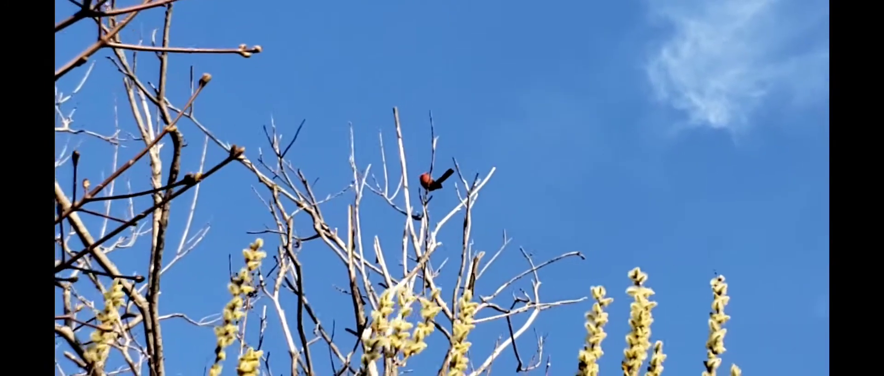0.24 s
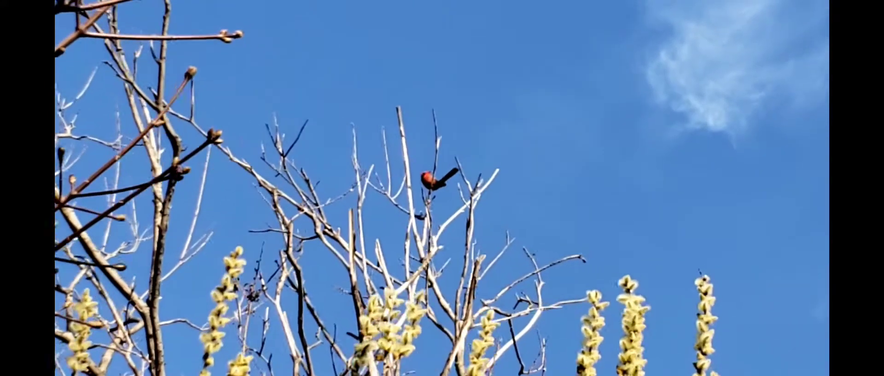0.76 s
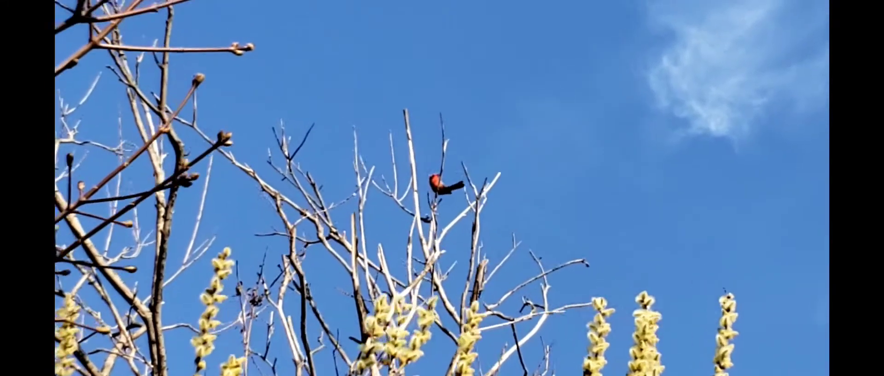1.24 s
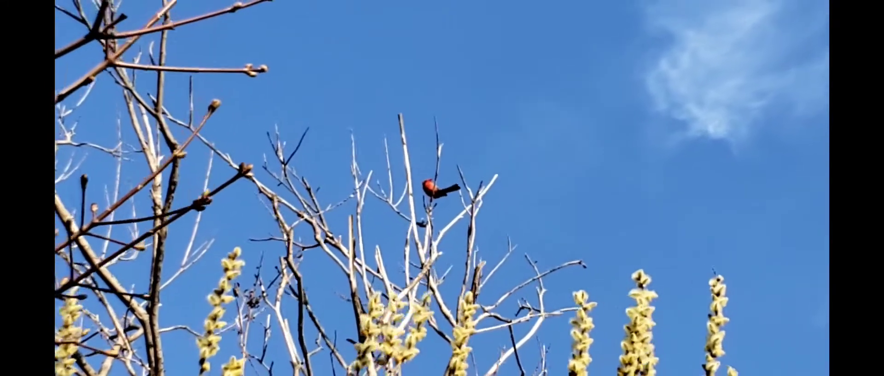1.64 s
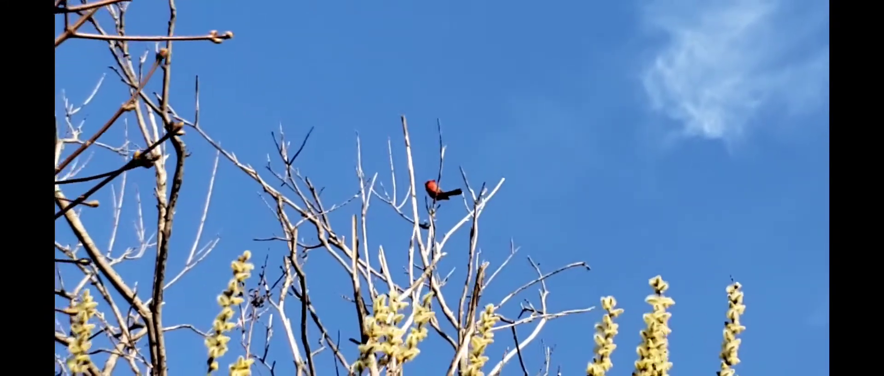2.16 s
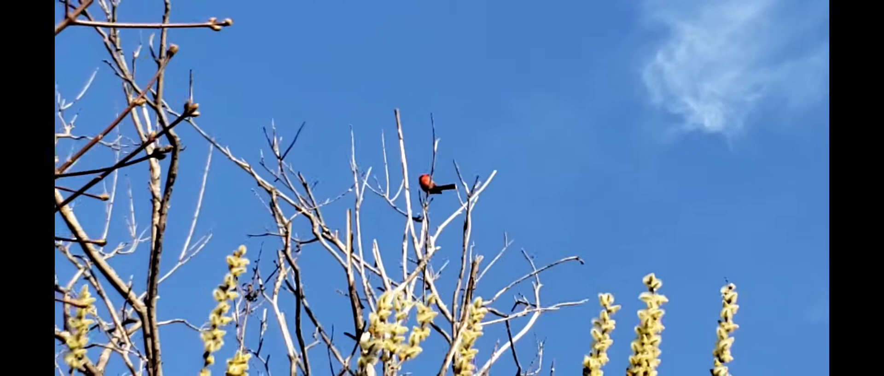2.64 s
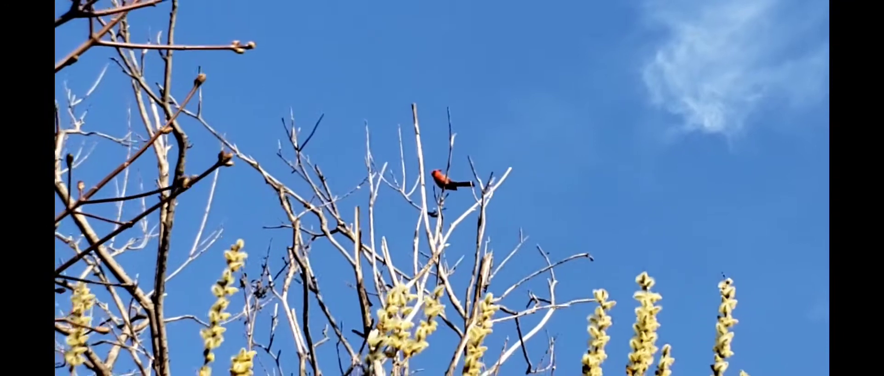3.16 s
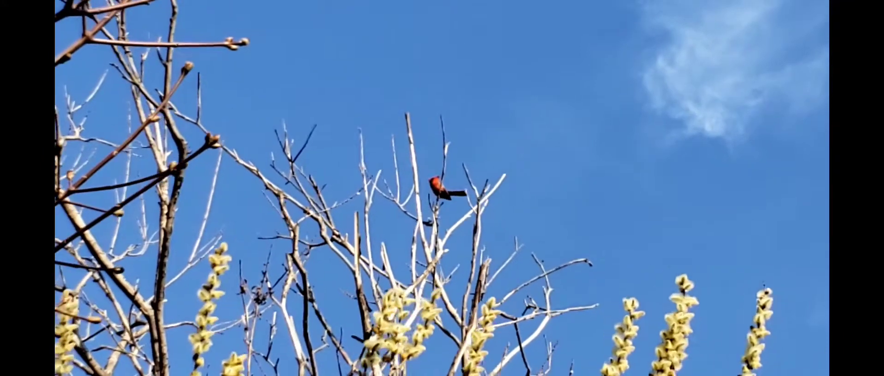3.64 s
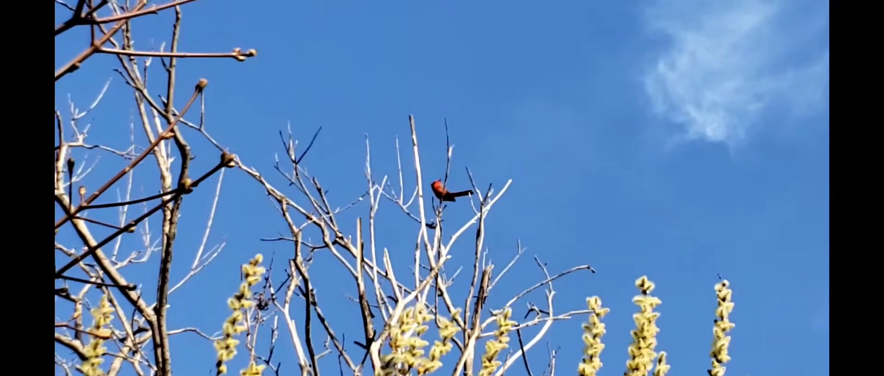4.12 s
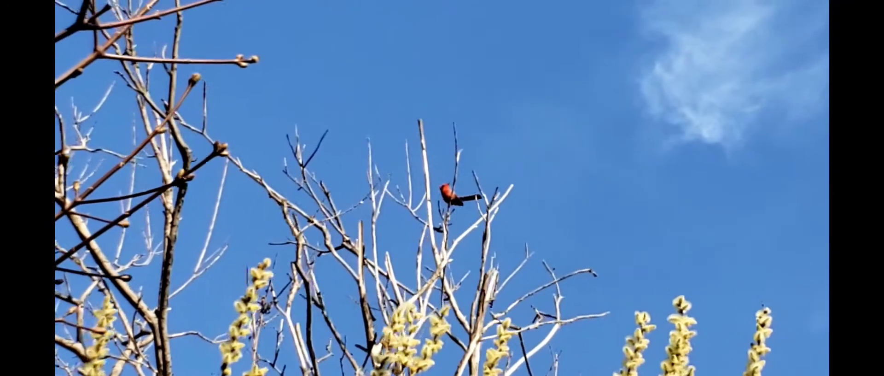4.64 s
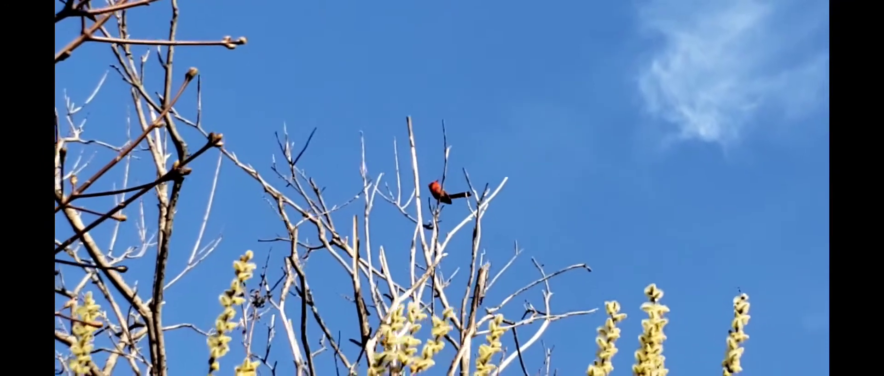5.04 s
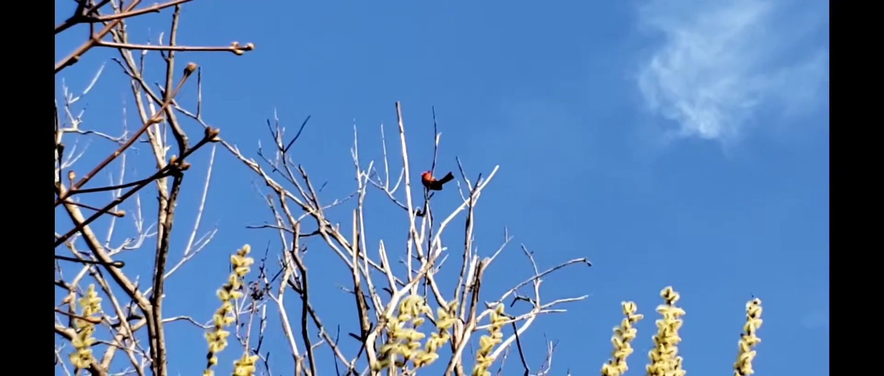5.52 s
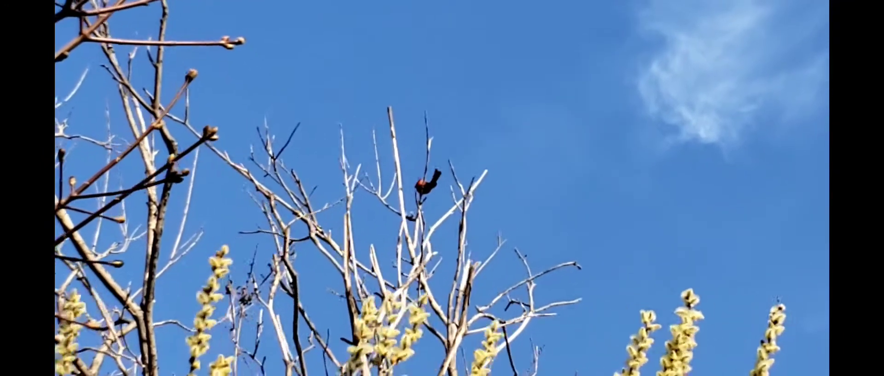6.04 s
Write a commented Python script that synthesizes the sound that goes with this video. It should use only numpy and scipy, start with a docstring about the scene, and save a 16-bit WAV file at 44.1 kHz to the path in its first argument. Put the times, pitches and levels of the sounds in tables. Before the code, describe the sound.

A red songbird in a bare treetop sings seven pure whistles, each swooping upward and swelling before stopping sharply, about every seven tenths of a second. Echo from trees and a wall trails each one. A hand-held microphone picks up low wind puffs, soft bumps and finger rubs. A small metal clink sounds close after the first whistle, and two more after the last. Distant outdoor air murmurs quietly.

```python
"""Light wind puffs on a hand-held microphone over far outdoor air, made of shaped noise, and the hand bumps it.
A cardinal in a bare treetop then sings seven rising whistles: gliding tones, echoed by a wall and the trees.
Between them come two falling chips, short ringing snaps, finger brushes on the case and a far bird's thin note.
Something small and metal, built from ringing modes and a noisy crack, clinks close by: once after
the first whistle, and twice more after the last."""
import sys
import numpy as np
from scipy import signal
from scipy.fft import rfft, irfft, next_fast_len
from scipy.io import wavfile
from scipy.ndimage import uniform_filter1d, map_coordinates

SR = 44100
rng = np.random.default_rng(int(sys.argv[2]) if len(sys.argv) > 2 else 0)


def pcm_store(signal):
    """Save signal as 16-bit PCM."""
    levels = np.round(np.clip(np.atleast_2d(signal), -1, 1) * 32767)
    wavfile.write(sys.argv[1], SR, levels.astype(np.int16).T)


N = 277080
TOP_HZ = 15700  # the recorder's band limit

# whistles: (end [s], length [s], glide early by [s], pitch ratio until the last flick, flick's pitch goal [Hz],
# level [dB], extra level of the low opening [dB], extra level of the overtones [dB])
WHISTLES = [(.732, .305, .011, 0.98, 3480, -5, -10, -1), (1.457, .325, -0.00085, 1.02, 3550, -4.5, -3, -1),
            (2.483, .328, -0.0031, 1.005, 3460, -5.5, -3.5, -5.5),
            (3.208, 0.37, 0.0054, 1.0, 3260, 2, -4, 0.5), (3.909, .46, 0, 1.0, 3390, 0.5, .5, 1.5),
            (4.573, .45, -0.00069, 0.99, 3330, -1.5, 2.5, 0), (5.241, .44, -.005, .988, 3170, -2, 3.5, 0)]
# the upward glide shared by all whistles, with two small steps: (time from the end [s], pitch [Hz])
GLIDE = [(-.44, 1350), (-.36, 1610), (-.28, 1795), (-.2, 2070), (-.145, 2250), (-.12, 2520), (-.065, 2790),
         (-.045, 3070), (-.018, 3360), (0, 3380)]
# their shared loudness, swelling three times and easing at each step: (time from the end [s], level [dB])
SWELL = [(-.44, -53.5), (-.35, -52.5), (-.27, -38), (-.18, -36), (-.15, -40.5), (-.1, -31.5), (-.075, -38),
         (-.037, -29.5), (-.016, -34.5), (0, -45.5)]
# the low opening gives way to the full voice: (start, finish), times from the end [s]
OPENING_S = (-.2, -0.11)
# the last flick heads for the whistle's own pitch goal: (start, finish), times from the end [s]
FLICK_S = (-0.068, -.02)
# overtone strength by where the overtone falls: (frequency [Hz], level [dB])
OVERTONES = [(3000, -20.5), (4500, -40.5), (6900, -31.5), (7700, -22.5), (8600, -31.5), (9700, -31.5),
             (11500, -36), (13000, -39), (14500, -30.5)]
# short falling chips between whistles: (time [s], starting pitch [Hz], level [dB])
CHIPS = [(.757, 2200, -54), (4.017, 2246, -48.5)]
# scattered echoes: (delay [s], level [dB], time to fade by 60 dB [s])
ECHOES = [(.002, -7, .12), (.035, -12, .22), (.074, -17, .13)]
# the branches send back mostly the middle of the glide: (frequency [Hz], level [dB])
ECHO_COLOUR = [(1700, -3), (2500, 1.5), (3400, -2.5)]
# high fizz that follows the whistles: (frequency [Hz], level [dB])
FIZZ = [(5000, -7), (8000, -8), (11500, 7), (15500, -17)]
# short snaps with a quick 2 kHz ring, most of them probably clipped bird chips: (time [s], level [dB])
SNAPS = [(.834, -52), (2.032, -44), (3.324, -50), (4.682, -44)]
# metal contacts: (time [s], level [dB], treble tilt [dB per octave], metal held 0 or free 1, thump level [dB])
CLINKS = [(0.9635, -25.5, -0.5, 0, -65), (0.9715, -42, 4, 0, -53), (5.4968, -40.5, 3, 1, -62),
          (5.504, -35, 4, 1, -60), (5.512, -47, 4, 1, -37.5), (5.6028, -36, 4.5, 1, -50),
          (5.609, -34, 2.5, 1, -32.5), (5.621, -42, 8, 1, -58)]
# the metal's ringing modes: (frequency [Hz], level [dB], time to fade by 60 dB [s], rings when held 0 or free 1)
METAL = [(1686, -13, 0.2, 0), (2766, 3.5, 0.05, 0), (2826, -4.5, 0.1, 0), (4430, -15.5, 0.12, 0),
         (5200, -14, 0.036, 0), (5950, -12.5, 0.11, 0), (6632, -13, 0.071, 0), (7800, -12, 0.058, 0),
         (2808, 7, 0.1, 1), (2890, -12, 0.3, 1), (3960, -6, 0.16, 1), (4680, -11, 0.12, 1),
         (4900, -30, .16, 1), (5110, -7.5, 0.19, 1), (6030, -14.5, 0.18, 1), (6530, -31, .09, 1),
         (6570, -14, 0.13, 1), (7600, -22, 0.11, 1), (8130, -18, 0.19, 1), (9652, -28, 0.27, 1),
         (10060, -25, 0.089, 1), (10700, -29, 0.17, 1), (11200, -26, 0.17, 1), (12140, -31, 0.096, 1),
         (14750, -31, 0.17, 1)]
# noise colour of a sharp crack or snap: (frequency [Hz], level [dB])
CRACK = [(800, -5), (1800, 7.5), (3000, 7.5), (6500, 1.5), (7300, -15), (8100, -14), (11500, -28),
         (13000, -20), (15000, -16)]
# finger brushes: (middle [s], spread [s], level [dB])
BRUSHES = [(0.539, .018, -55), (0.834, 0.015, -47.5), (0.922, 0.027, -56.5), (1.107, 0.073, -65),
           (1.405, 0.037, -55.5), (2.042, 0.015, -61), (3.332, 0.018, -60), (3.465, 0.039, -52.5),
           (4.7, 0.063, -62.5), (5.354, 0.018, -56.5)]
# noise colour of fingers on the case: (frequency [Hz], level [dB])
CASE = [(2500, -16), (3600, -3.5), (3950, 6.5), (4400, -6.5), (6300, -7), (8000, -10.5), (9000, -18),
        (15000, -23)]
# soft bumps of the hand: (middle [s], pitch [Hz], level [dB])
BUMPS = [(0.313, 66.1, -28.5), (0.583, 61, -51), (0.884, 78, -33.5), (1.532, 55.4, -36.5),
         (2.446, 65.4, -46), (2.624, 156, -26.5), (2.801, 129, -27), (5.904, 68.5, -30), (6.154, 76, -37.5)]
# puffs of wind on the microphone: (peak [s], length [s], buffet level [dB], flutter level [dB])
GUSTS = [(0.331, 0.044, -35, -45), (.61, 0.1, -36, -37.5), (0.758, 0.093, -43.5, -42.5),
         (.92, .1, -40.5, -51), (1.321, 0.094, -39, -47.5), (1.514, 0.044, -44.5, -56),
         (2.047, .08, -46, -59), (2.443, 0.067, -41.5, -55), (2.607, 0.17, -45.5, -41),
         (2.793, 0.03, -39, -40.5), (3.036, 0.12, -39.5, -47), (3.405, 0.12, -41.5, -54.5),
         (3.605, 0.084, -42, -52), (4.556, .25, -50, -70), (5.63, 0.046, -45, -58), (6.15, .1, -48, -52)]
# colour of the low wind buffet: (frequency [Hz], level [dB])
BUFFET = [(15, -23), (30, -10), (60, -2.5), (100, -4), (160, -14.5), (300, -50), (600, -66)]
# colour of the higher wind flutter: (frequency [Hz], level [dB])
FLUTTER = [(60, -14.5), (140, 6), (220, -1), (350, -3.5), (550, -16.5), (1200, -75)]
# strength of the distant air: (time [s], level [dB])
AIR = [(0.0, -55.5), (0.19, -58), (5.68, -53.5), (5.75, -56), (5.96, -52.5), (6.28, -54.5)]
# colour of the far outdoor murmur: (frequency [Hz], level [dB])
DISTANCE = [(80, -42), (250, -0.5), (500, -3.5), (900, 0.5), (1400, -6), (2000, -15.5), (2600, -14.5),
            (3400, -27), (5000, -34.5), (9000, -49)]
# colour of the higher rush: (frequency [Hz], level [dB])
RUSH = [(500, -25), (1000, -1.5), (1500, 5), (2400, -1), (3400, -31), (6000, -28.5)]
# colour of the thin hiss: (frequency [Hz], level [dB])
HISS = [(1500, -48), (3500, 8), (5000, 3.5), (7500, 6), (8700, -25), (10500, -9), (12000, 3.5),
        (15500, -12)]


def amp(db):
    """Turn decibels into a plain multiplier."""
    return 10 ** (np.asarray(db) / 20)


def unit(x):
    """Scale x to an average (rms) strength of 1."""
    return x / np.sqrt(np.mean(x ** 2) + 1e-20)


def along(points, hz):
    """Read a (frequency, value) curve at hz, with frequency on a log axis."""
    f, v = np.transpose(points)
    return np.interp(np.log(hz + 1), np.log(f), v)


def clock():
    """The time of each sample, in seconds."""
    return np.arange(N) / SR


def wobble(rate):
    """A smooth random curve through rate random points a second."""
    points = rng.standard_normal(int(N * rate / SR) + 4)
    return map_coordinates(points, [clock() * rate])


def filtered(x, response):
    """Multiply each frequency of x by response(frequency)."""
    m = next_fast_len(N + 8192)  # room for tails past the end
    hz = np.fft.rfftfreq(m, 1 / SR)
    return irfft(rfft(x, m) * response(hz), m)[..., :N]


def noise(spectrum, alike):
    """Coloured stereo noise of rms 1; alike is the left-right correlation."""
    a, b = filtered(rng.standard_normal((2, N)), lambda hz: amp(along(spectrum, hz)))
    turn = np.arccos(np.clip(alike, -1, 1)) / 2
    return unit(np.cos(turn) * a + np.sin(turn) * np.array([b, -b]))


def add(out, s, sound):
    """Mix a sound into out from time s."""
    part = out[..., max(round(s * SR), 0):][..., :sound.shape[-1]]
    part += sound[..., :part.shape[-1]]


def scatter(x, delay, t60):
    """Many twigs and surfaces return x as a fading random tail, different on each side."""
    t = np.arange(SR) / SR
    tail = rng.standard_normal((2, SR)) * amp(-60 * t / t60)
    tail /= np.linalg.norm(tail, axis=1, keepdims=True)
    late = np.pad(x, (max(round(delay * SR), 0), 0))
    return signal.fftconvolve(late[None], tail, axes=1)[:, :N]


def cardinal(song_db=-1, lag=.00004, side_db=0.2, trees_db=-18, overtone_db=-6, overtone_echo_db=-3):
    """The song arrives directly, from the branches and wall, and as a long wash from the trees."""
    wall_s, wall_db = .078, -18.5
    tone, overtones = whistles()
    song = amp(song_db) * tone + chips()

    # the direct sound reaches the left side lag seconds after the right
    half_turn = lag * np.array([[-1], [1]])
    direct = filtered(song + amp(overtone_db) * overtones, lambda hz: np.exp(1j * np.pi * hz * half_turn))
    echoes = sum(amp(db) * scatter(song, delay, t60) for delay, db, t60 in ECHOES)
    add(echoes, wall_s, amp(wall_db) * song)
    echoes = filtered(echoes, lambda hz: amp(along(ECHO_COLOUR, hz)))
    wash = amp(trees_db) * scatter(song, delay=.04, t60=.65)
    sheen = amp(overtone_echo_db) * scatter(overtones, delay=.001, t60=0.33)

    # a faint high fizz swells and fades with each whistle
    loudness = np.sqrt(np.abs(uniform_filter1d(tone ** 2, size=3000)))
    fizz = amp(-31.0) * loudness * noise(FIZZ, alike=0)
    return direct * amp([[side_db], [-side_db]]) + echoes + wash + sheen + fizz


def whistles(shimmer_db=2.2, flicker_db=3, blur=0.45):
    """Nearly pure upward glides; faint overtones at whole multiples of the pitch flicker and blur."""
    edge_s = .005  # soft start and stop
    fade_in_s, fade_in_db = 0.092, -11  # each whistle grows out of a faint start
    tone, overtones = np.zeros(N), np.zeros(N)
    drift = 1 + .004 * wobble(90)
    shimmer = shimmer_db * wobble(70)
    k = np.arange(2, 10)[:, None]  # overtone numbers
    flicker = np.array([flicker_db * wobble(24.92) for _ in k])
    smear = np.array([blur * wobble(400) for _ in k])

    for end, length, early, ratio, goal_hz, level_db, opening_db, bright_db in WHISTLES:
        on = (clock() > end - length) & (clock() < end + edge_s / 2)
        t = clock()[on] - end

        hz = np.interp(t + early, *np.transpose(GLIDE))
        hz *= np.interp(t, FLICK_S, [ratio, goal_hz / GLIDE[-1][1]]) * drift[on]
        phase = 2 * np.pi * np.cumsum(hz) / SR

        db = np.interp(t + early, *np.transpose(SWELL)) + level_db
        db += np.interp(t, OPENING_S, [opening_db, 0])
        db += np.interp(t + length, [0, fade_in_s], [fade_in_db, 0])
        edges = np.clip(np.minimum(t + length, edge_s / 2 - t) / edge_s, 0, 1)
        level = np.sqrt(2) * amp(db + shimmer[on]) * edges

        tone[on] += level * np.sin(phase)
        share = amp(bright_db + flicker[:, on] + along(OVERTONES, k * hz)) * (k * hz < TOP_HZ)
        overtones[on] += level * np.sum(share * np.sin(k * phase + smear[:, on]), axis=0)
    return tone, overtones


def chips(length=0.0288, fall=0.178):
    """Quiet short notes whose pitch drops quickly by the share fall."""
    out, t = np.zeros(N), np.arange(round(length * SR)) / SR
    arch = np.sin(np.pi * t / length)
    for s, hz, db in CHIPS:
        phase = 2 * np.pi * np.cumsum(hz * (1 - fall * t / length)) / SR
        add(out, s, amp(db) * arch * np.sin(phase))
    return out


def snaps(t60=0.029, ring_hz=1980, ring_db=-1):
    """Short snaps of noise with a quick 2 kHz ring, most of them probably clipped bird chips."""
    t = clock()
    fades = sum(amp(db - 60 * np.abs(t - s) / t60) * (t >= s) for s, db in SNAPS)
    ring = amp(ring_db) * np.sqrt(2) * np.sin(2 * np.pi * ring_hz * t)
    return fades * (noise(CRACK, alike=.1) + ring)


def clinks(ring_db=-2, crack_db=-9, held_t60=0.064, free_t60=0.12, rattle=0.77):
    """Each contact rings the metal, which rattles as it rings, spits a crack and shakes the microphone."""
    thump_hz, thump_t60, thump_rise, thump_delay = 54, 0.16, 0.015, 0.011  # Hz, then seconds
    out, burst, t = np.zeros((2, N)), np.zeros(N), np.arange(SR // 3) / SR
    attack = 1 - np.exp(-(t / .0003) ** 2)
    thump = 2 * amp(-60 * t / thump_t60) * np.minimum(t / thump_rise, 1) * np.sin(2 * np.pi * thump_hz * t)

    for s, db, treble_db, free, thump_db in CLINKS:
        for hz, mode_db, t60, group in METAL:
            if round(group) != round(free):
                continue
            tilt_db = treble_db * np.log2(hz / 2800)
            uneven_db = rng.normal(0, 2.2, (2, 1))  # differs left and right
            strength = amp(db + ring_db + mode_db + tilt_db + uneven_db)
            shake = rattle * map_coordinates(rng.standard_normal(len(t)), [t * 300])
            phase = rng.uniform(0, 2 * np.pi) + rng.normal(0, 1.0, (2, 1)) + shake
            add(out, s, strength * attack * amp(-60 * t / t60) * np.sin(2 * np.pi * hz * t + phase))
        crack_t60 = free_t60 if round(free) else held_t60
        add(burst, s, amp(db + crack_db - 60 * t / crack_t60))
        add(out, s + thump_delay, amp(thump_db) * thump)
    return (out + burst * noise(CRACK, alike=0.044)) * amp([[1], [-1]])  # a little louder on the left


def hand():
    """Fingers rub the case as grainy noise and bump it softly with short low tones."""
    t = clock()
    rub = sum(amp(db) * np.exp(-.5 * ((t - s) / spread) ** 2) for s, spread, db in BRUSHES)
    grain = unit(amp(3.5 * wobble(300)))
    brushes = rub * grain * noise(CASE, alike=0.1)

    bumps = np.zeros(N)
    for s, hz, db in BUMPS:
        bumps += amp(db) * np.exp(-((t - s) * hz) ** 2) * np.cos(2 * np.pi * hz * (t - s))
    return brushes + bumps * amp([[0], [-2]])


def wind(buffet_gain_db=1.5, flutter_gain_db=1.0, lumps_db=3.0):
    """Eddies come in lumps, partly shared and partly separate at each microphone port."""
    push, flap = gusts()
    lumps = unit(amp(lumps_db * np.array([wobble(30), wobble(30)])))
    slaps = unit(amp(4 * wobble(38)))
    # the buffet strikes the two sides independently, a little harder on the left
    buffet = push * amp(buffet_gain_db) * noise(BUFFET, alike=-0.036) * amp([[.7], [-.5]])
    flutter = flap * amp(flutter_gain_db) * slaps * noise(FLUTTER, alike=0.32)
    return lumps * (buffet + flutter)


def gusts():
    """Strength of the low buffet and higher flutter: puffs rise fast and fall slower over a light breeze."""
    calm_db = np.array([[-53.5], [-58]])  # buffet and flutter between puffs
    freshen = 0.46  # dB per second
    rise, fall = 0.88, 1.25  # shares of a puff's length
    power = amp(calm_db + freshen * clock()) ** 2
    for s, length, buffet_db, flutter_db in GUSTS:
        u = (clock() - s) / length
        puff = np.exp(-(u / np.where(u < 0, rise, fall)) ** 2)
        power = power + (amp([[buffet_db], [flutter_db]]) * puff) ** 2
    return np.sqrt(power)


def far_bird(s=1.575, hz=5700, db=-69, t60=0.53, rise=0.0065):
    """One thin, distant note: a steady tone that starts quickly and fades away."""
    t = np.maximum(clock() - s, 0)
    return amp(db - 60 * t / t60) * np.minimum(t / rise, 1) * np.sin(2 * np.pi * hz * t)


def air(murmur_db=3, rush_db=-4, lead=0.000376, hiss_db=-75):
    """The far murmur of the outdoors, a higher rush from the left, and a thin hiss, all shaped noise."""
    air_db = np.interp(clock(), *np.transpose(AIR))
    # the rush reaches the left side lead seconds before the right
    half_turn = lead * np.array([[1], [-1]])
    rush = filtered(noise(RUSH, alike=1), lambda hz: np.exp(1j * np.pi * hz * half_turn))
    far = amp(murmur_db) * noise(DISTANCE, alike=0.48) + amp(rush_db) * rush
    return amp(air_db + 0.74 * wobble(6.4)) * far + amp(hiss_db) * noise(HISS, alike=0.046)


def scene():
    """Birds, near noises and weather together."""
    return cardinal() + snaps() + clinks() + hand() + wind() + far_bird() + air()


def record(dry):
    """The recorder keeps nothing above its band limit."""
    return filtered(dry, lambda hz: hz < TOP_HZ)


dry = scene()
out = record(dry)
pcm_store(out)
```